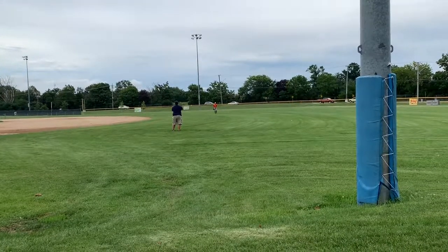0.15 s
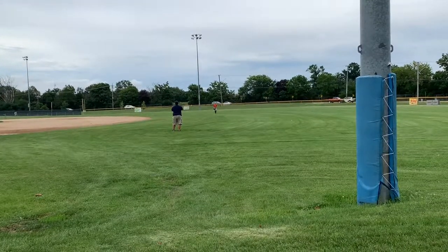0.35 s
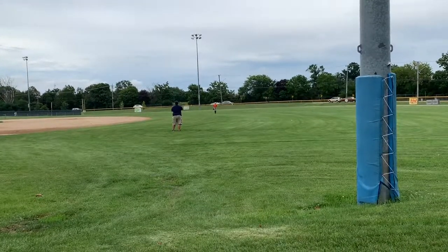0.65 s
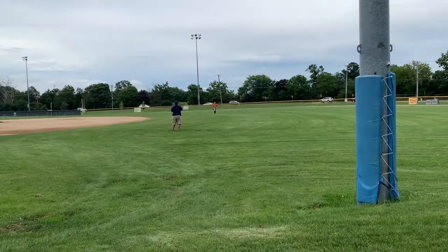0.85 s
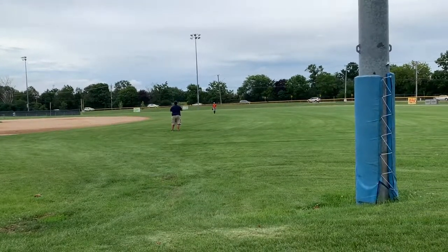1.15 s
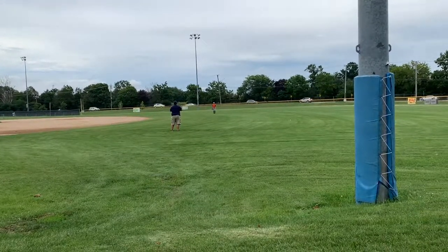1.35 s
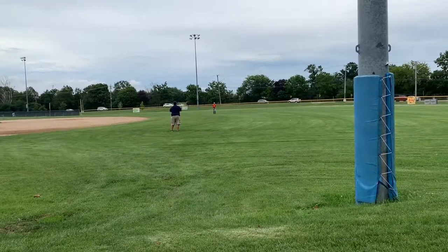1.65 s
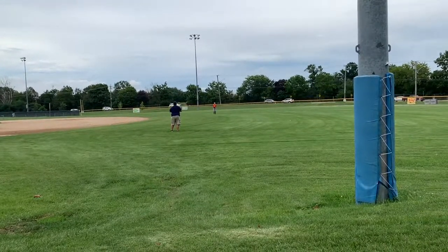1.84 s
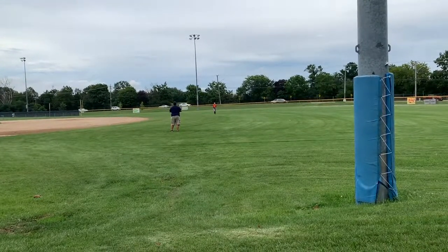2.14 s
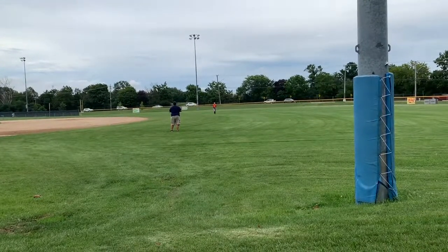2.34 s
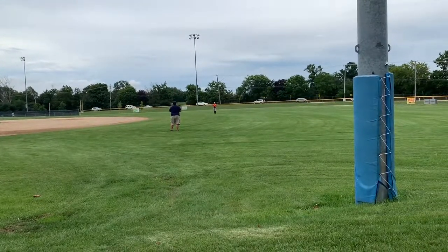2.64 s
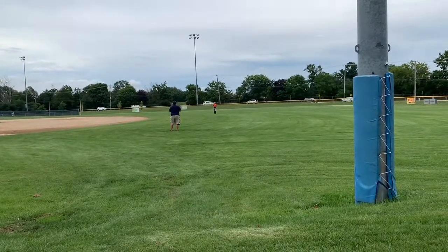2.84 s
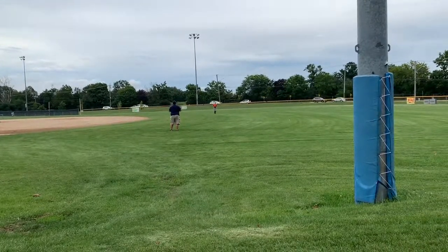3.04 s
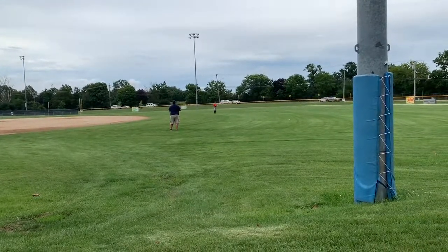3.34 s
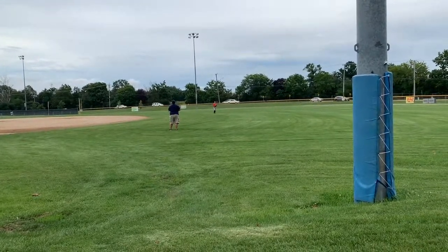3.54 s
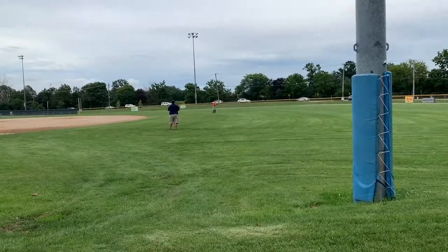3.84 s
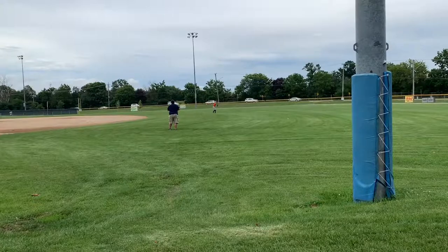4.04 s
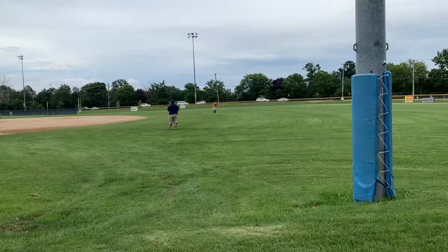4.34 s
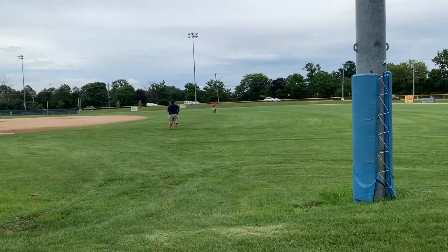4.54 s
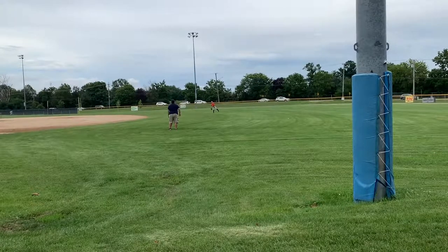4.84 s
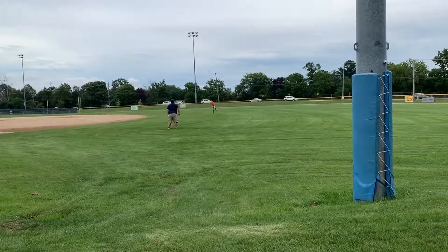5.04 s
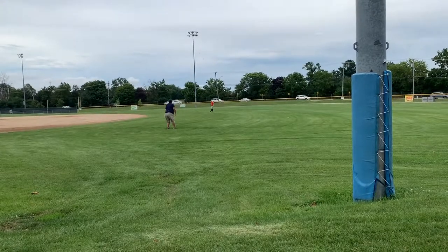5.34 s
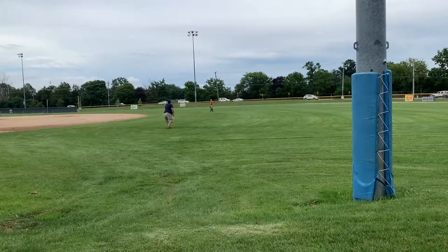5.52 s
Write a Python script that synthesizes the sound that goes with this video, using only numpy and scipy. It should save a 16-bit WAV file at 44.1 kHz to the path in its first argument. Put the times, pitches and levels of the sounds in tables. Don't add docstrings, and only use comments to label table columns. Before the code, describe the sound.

Outdoors on an open grass ball field, deep traffic rumble and soft tyre hiss come from a road beyond the outfield. A truck engine drones, then climbs in revs midway. A cricket chirps rapidly close to the right, another trills in repeated swells. A ball pops into a distant glove early on and again about a second later. Stereo phone microphone, grass faintly brushing its right side.

```python
import sys
import numpy as np
from scipy import signal
from scipy.fft import rfft, irfft
from scipy.io import wavfile
from scipy.ndimage import uniform_filter1d

SR = 44100
rng = np.random.default_rng(int(sys.argv[2]) if len(sys.argv) > 2 else 0)


def master(y):
    cut = np.clip(np.atleast_2d(y).T, -1, 1)
    pcm = np.round(cut * 32767)
    wavfile.write(sys.argv[1], SR, pcm.astype(np.int16))


def level_to_linear(level):
    exponent = np.asarray(level, float) / 20
    return 10 ** exponent


N = 250488
TIME = np.arange(N) / SR
HZ = np.arange(N // 2 + 1) * SR / N + 1e-3

# f/Hz, likeness/0-1
LIKENESS = [(60, 0.99), (170, 0.92), (260, 0.8), (350, 0.71), (450, 0.05), (800, 0.13), (1150, 0.44),
            (1550, 0.38), (2400, 0.27), (4300, 0.07), (7000, 0.43), (9000, 0)]
# f/Hz, left minus right/dB
LEAN = [(60, -3), (180, -0.7), (340, 2), (690, 0.7), (1150, 3), (1600, 2.5), (2300, 2), (4000, 1.5),
        (6500, -1), (7700, 1), (8700, -7.5)]

# t/s, level/dB
TRAFFIC = [(0, -41), (.04, -39), (.15, -43), (.43, -40.5), (1.85, -42.5), (2.03, -41), (2.79, -42),
           (3.31, -41.5), (3.45, -42), (3.84, -41.5), (4.4, -42), (5.19, -41.5), (5.4, -40), (5.68, -39)]
# f/Hz, density/dB per Hz
RUMBLE = [(8.8, -38), (15, -17.5), (49, 0.5), (97, -0.5), (129, -4), (157, -7), (250, -14.5), (432, -33.5),
          (577, -33), (700, -32), (910, -56), (1540, -120)]
# f/Hz, density/dB per Hz
TYRES = [(210, -9.5), (440, -6), (582, -11), (775, -1), (1320, -0.5), (2200, -7), (3090, -14),
         (4000, -16.5), (4750, -18), (5150, -20.5), (6100, -24), (7900, -30), (8600, -21), (8850, -26),
         (9050, -53), (10000, -61)]
# t/s, level against the other traffic/dB
LORRIES = [(0, -6), (.2, -5.5), (.5, -1), (.7, -5.5), (1.0, -2.5), (1.4, 3.5), (1.7, 3), (1.85, 5.5),
           (1.95, -6), (2.1, 0.5), (3.0, -1), (3.9, 4), (4.2, 5.5), (4.5, 1), (4.75, -3), (5.0, -1),
           (5.3, 2), (5.6, -6.5)]
LORRY_HZ = 80
TYRE_DB, TYRE_FOLLOW = -53.5, 0.14

# t/s, firing rate of one cylinder bank/Hz, load level/dB
TRUCK = [(0, 44.8, -45.5), (.3, 44.84, -55.5), (.55, 47.66, -46.5), (1.1, 46.58, -47.5), (1.66, 45.52, -50),
         (1.92, 44.12, -51.5), (2.09, 44.76, -40.5), (2.58, 48.79, -48), (2.75, 51.99, -48),
         (3.01, 59.48, -47.5), (3.35, 61.35, -48), (4.3, 61.13, -48.5), (4.55, 60, -57.5),
         (4.78, 60.1, -43), (5.0, 59.58, -61), (5.4, 60.3, -45), (5.68, 60.3, -58)]
ORDERS_DB, ORDER_WAVER_DB = [-5.5, -1, -12.5], [2, 1, 2.5]

# t/s, level/dB
FAR_SONG = [(0, -81), (.3, -71), (.4, -76), (1.1, -83), (1.45, -82), (1.6, -82), (2.25, -79), (2.4, -76),
            (2.8, -75), (3.1, -77), (3.8, -80), (4.2, -93), (5.3, -81), (5.68, -74)]
# t/s, peak level/dB, f/Hz, left minus right/dB
FAR_CHIRPS = [(0.0807, -70, 4740, -0.5), (0.3496, -78, 4830, 3), (0.8195, -75, 4750, 8),
              (0.8644, -67, 4830, 0), (2.2947, -68, 4590, -3), (2.3201, -72, 4740, 3.0),
              (2.528, -69, 4620, 3.5), (2.5543, -77, 4700, -10), (2.9219, -88, 4690, -4),
              (3.0036, -72, 4580, -14), (4.0991, -75, 4704, 0), (4.145, -74, 4676, -4),
              (4.2664, -76, 4745, -8), (4.536, -60, 4715, 3), (4.565, -67, 4540, 7),
              (4.5999, -69, 4810, 1.5), (4.6998, -85, 4790, 1.5), (4.9806, -71, 4570, 0.5),
              (5.2056, -71, 4550, -5)]
# f/Hz, density/dB per Hz
CHORUS = [(5000, -50), (5800, -30), (6500, -9), (7000, -3), (7450, 0), (7850, -4), (8300, -12), (8900, -30),
          (9400, -60)]
CHORUS_DB = -74

# start t/s, hold/s, level/dB
BRUSHES = [(0.027, 0.25, -93), (.49, .45, -92), (1.1, 0.25, -92), (1.382, 0.12, -85), (1.8, .12, -92),
           (1.975, 0.035, -83), (2.104, 0.0069, -72.5), (2.113, .004, -76), (2.151, 0.032, -82),
           (2.202, 0.16, -91), (2.42, 0.18, -90), (2.66, 0.073, -86), (2.84, .12, -83), (2.996, 0.32, -87),
           (3.349, 0.22, -90), (3.63, 0.12, -81), (3.857, 0.19, -89), (4.28, 0.21, -91),
           (4.55, 0.057, -83.5), (4.66, 0.19, -86.5), (4.991, .1, -90), (5.121, 0.48, -91),
           (5.601, 0.019, -85), (5.643, 0.035, -70)]
BRUSH_RISE_S, BRUSH_FALL_S, STILL_DB, BRUSH_PATCHY_DB = 0.0052, 0.017, -104, -1.5

# share of the stroke/0-1, f/Hz, level/dB
STROKE = [(0, 7720, -13), (.1, 8150, -5), (.25, 8145, -4.5), (.4, 8260, -6), (.55, 8190, -7),
          (.72, 8060, -0.5), (.9, 8050, -10.5), (1, 7870, -15)]
# t/s at the middle of the first stroke, strokes/count
RUNS = [(.0301, 3), (.2145, 5), (.52, 1), (.5834, 1), (.6464, 4), (.8935, 1), (.961, 4), (1.2088, 2),
        (1.3336, 2), (1.4575, 12), (2.189, 8), (2.6725, 12), (3.4048, 2), (3.523, 1), (3.5873, 15),
        (4.4998, 5), (4.8731, 1), (4.9637, 4), (5.2037, 3), (5.3829, 3), (5.5664, 1), (5.6255, 1)]
# t/s, level/dB
EFFORT = [(0, -59.5), (.39, -58), (.55, -61.5), (.8, -57), (1.0, -60.5), (1.5, -59.5), (1.9, -61),
          (2.06, -58), (2.25, -59), (2.5, -63), (2.63, -59), (2.86, -63.5), (3.5, -62), (3.65, -61),
          (3.9, -59.5), (4.2, -61.5), (4.7, -59.5), (5.68, -60.5)]
STROKE_S, BEAT_S, BEAT_SCATTER_S = .021, .0607, .0004
CHIRP_LEFT_DB, STROKE_SCATTER_DB = -15, 0.5

# t/s of the last and loudest pulse, level/dB
TRILLS = [
    (.454, -62),
    (1.099, -62),
    (1.720, -65.5),
    (2.336, -68),
    (2.972, -65),
    (3.642, -65),
    (4.277, -64.5),
    (4.960, -66),
    (5.600, -68),
]
# t/s, length/s, start f/Hz, end f/Hz, level/dB
BIRD = [
    (.333, .022, 5500, 6300, -76),
    (.415, .038, 5550, 4800, -75),
]
# t/s, peak level/dB, leather snap f/Hz, left port's delay/samples, ground bounce/dB
POPS = [
    (1.44243, -47.3, 4500, 16, -20),
    (2.54196, -46.8, 4950, 16, -7),
]

# f/Hz, density/dB per Hz
HISS = [(7500, -30), (8800, -20), (10500, -11), (11300, -13), (12100, -12), (12400, -1), (13300, 0),
        (14300, -2), (15000, -5)]
# f/Hz, side minus mid/dB
HISS_APART = [(9000, 0), (11000, 8), (12000, 8), (12500, -6), (13500, -4), (15000, -1)]
HISS_DB = -86


def over_hz(table):
    hz, value = np.transpose(table)
    return np.interp(np.log(HZ), np.log(hz), value)


def over_time(table):
    s, *columns = np.transpose(table)
    return [np.interp(TIME, s, c) for c in columns]


def unit(x):
    return x / np.sqrt(np.mean(x ** 2))


def walk(rate):
    k = int(SR / rate)
    held = np.repeat(rng.standard_normal(N // k + 1), k)
    return unit(uniform_filter1d(uniform_filter1d(held, k), k)[:N])


def band(x, low_hz, high_hz):
    return signal.sosfilt(signal.butter(2, [low_hz, high_hz], "band", fs=SR, output="sos"), x)


def add(out, sound, s, left_db, late=0.):
    for side, gain, start in ((0, level_to_linear(left_db), s * SR + late), (1, 0.97, s * SR)):
        i = max(int(round(start)), 0)
        piece = sound[:max(N - i, 0)]
        out[side, i:i + len(piece)] += gain * piece


def stroke(length_s, hz, db, phase):
    share = np.linspace(0, 1, int(length_s * SR))
    edge = np.clip(np.minimum(share, 1 - share) / 0.062, 0, 1)
    tone = np.sin(phase + 2 * np.pi * np.cumsum(hz(share)) / SR)
    return edge * level_to_linear(db(share)) * np.sqrt(2) * tone


def field_noise(spectrum, lag, flicker_db):
    shared, left, right = rfft(rng.standard_normal((3, N)))
    like = np.clip(over_hz(LIKENESS), 0, 1)
    lean = level_to_linear(over_hz(LEAN) / 2)
    late = np.exp(-2j * np.pi * HZ * lag / SR)
    alike, apart = np.sqrt(like) * shared, np.sqrt(1 - like)
    pair = np.array([lean * (alike * late + apart * left), (alike + apart * right) / lean])
    pair = pair * level_to_linear(over_hz(spectrum))
    out = 0
    for octave in range(4, 15):
        window = np.cos(np.pi / 2 * np.clip(np.log2(HZ) - octave, -1, 1)) ** 2
        out = out + irfft(pair * window, N) * level_to_linear(flicker_db * walk(9))
    return unit(out)


def patchy(x, spread_db, full_hz):
    hz, _, cells = signal.stft(x, SR, nperseg=1024)
    field = rng.standard_normal(cells.shape[1:])
    field = uniform_filter1d(field, size=2, axis=0)
    field = unit(uniform_filter1d(field, size=2, axis=1))
    depth_db = spread_db * np.sqrt(np.clip(hz / full_hz, 0, 1))[:, None]
    even_db = depth_db ** 2 * np.log(10) / 20
    faded = signal.istft(cells * level_to_linear(depth_db * field - even_db), nperseg=1024)[1]
    return unit(faded[:, :N])


def road():
    traffic_db, = over_time(TRAFFIC)
    lorry_db, = over_time(LORRIES)
    rumble = field_noise(RUMBLE, lag=2.6, flicker_db=1.82)
    deep = signal.sosfiltfilt(signal.butter(2, LORRY_HZ, fs=SR, output="sos"), rumble)
    rumble = rumble + deep * (level_to_linear(lorry_db) - 1)
    tyres = patchy(field_noise(TYRES, lag=12.5, flicker_db=.35), spread_db=4, full_hz=5000)
    swell_db = TYRE_FOLLOW * (traffic_db - traffic_db.mean())
    return rumble * level_to_linear(traffic_db - 0.5) + tyres * level_to_linear(TYRE_DB + swell_db + 0.2 * walk(2.877))


def truck():
    hz, load_db = over_time(TRUCK)
    turn = 2 * np.pi * np.cumsum(hz * (1 + 0.003 * walk(6))) / SR
    tone = 0
    for k, db, waver_db in zip((1, 2, 3), ORDERS_DB, ORDER_WAVER_DB):
        level_db = load_db + db + waver_db * walk(2.86) + 1.9 * walk(7)
        tone = tone + level_to_linear(level_db) * np.sqrt(2) * np.sin(k * turn + k)
    return tone * level_to_linear(np.array([[-1.1], [1.1]]))


def far_crickets():
    level_db, = over_time(FAR_SONG)
    pulses = np.sin(2 * np.pi * np.cumsum(44 + 9 * walk(12)) / SR)
    gate = np.clip(pulses + .7, 0, 1)
    tone = gate * np.sin(2 * np.pi * np.cumsum(4165 + 28 * walk(40)) / SR)
    out = unit(tone) * level_to_linear(level_db - 3 + 2.6 * np.array([walk(22), walk(22)]))
    for (s, db, hz, pan_db), phase in zip(FAR_CHIRPS, rng.uniform(0, 10.6, len(FAR_CHIRPS))):
        chirp = stroke(.016, lambda u: hz + 110 - 220 * u, lambda u: -20 * (u - .4) ** 2, phase)
        add(out, level_to_linear(db - 12.0 - pan_db / 2) * chirp, s, pan_db)
    return out


def chorus():
    return level_to_linear(CHORUS_DB + 1.2 * walk(24.9)) * field_noise(CHORUS, lag=15.35, flicker_db=.5)


def rustle():
    level = level_to_linear(STILL_DB)
    for s, hold, db in BRUSHES:
        rise = np.minimum(TIME - s, 0) / BRUSH_RISE_S
        fall = np.maximum(TIME - s - hold, 0) / BRUSH_FALL_S
        level = level + level_to_linear(db) * np.exp(rise - fall)
    grains = rng.standard_normal((2, N)) * level_to_linear(1.0 * walk(420))
    thin = unit(band(grains, 8700, 10600)) * level_to_linear(np.array([[-14], [5]]))
    broad = unit(band(grains, 3500, 12500)) * level_to_linear(np.array([[-8], [-4]]))
    return (thin + broad) * level * level_to_linear(BRUSH_PATCHY_DB * walk(25.12))


def near_cricket():
    out = np.zeros((2, N))
    share, hz, db = np.transpose(STROKE)
    beats = np.concatenate([first + BEAT_S * np.arange(strokes) for first, strokes in RUNS])
    levels_db = np.interp(beats, *np.transpose(EFFORT))
    for s, level_db, (a, b, c, d, e, f) in zip(beats, levels_db, rng.standard_normal((len(beats), 6))):
        def pitch(u):
            return np.interp(u, share, hz) + 18 * b

        def loudness(u):
            return np.interp(u, share, db) + 3.1 * c * (u - .5) + 2.1 * np.sin(22 * u + 9 * d)

        tone = stroke(STROKE_S * (1 + 0.037 * a), pitch, loudness, 9 * d)
        start = s + BEAT_SCATTER_S * f - .46 * STROKE_S
        add(out, level_to_linear(level_db + 3.0 + STROKE_SCATTER_DB * e) * tone, start, CHIRP_LEFT_DB, late=10.0)
    out[:, 230:] += level_to_linear(-15) * out[:, :-230]
    return out


def trilling_cricket():
    out = np.zeros((2, N))
    back = np.arange(20)
    gap_s = 0.011 + 0.011 * np.exp(-(back / 6.7) ** 2)
    before_s = np.cumsum(gap_s) - gap_s[0]
    for (end, level_db), chance in zip(TRILLS, rng.standard_normal((len(TRILLS), len(back), 2))):
        for k, before, gap, (a, b) in zip(back, before_s, gap_s, chance):
            tone = stroke(0.8 * gap, lambda u: 8640 - 120 * u + 15 * a, lambda u: -50 * (u - .5) ** 2, 9 * b)
            add(out, level_to_linear(level_db + 1 - .5 * k + 1.8 * b) * tone, end - before - .34 * gap, -10, late=12)
    return out


def bird():
    out = np.zeros((2, N))
    for s, length, start_hz, end_hz, db in BIRD:
        note = stroke(length, lambda u: start_hz + (end_hz - start_hz) * u, lambda u: -16 * (u - .5) ** 2, 0)
        add(out, level_to_linear(db) * note, s, 1.5)
    return out


def glove():
    out, t = np.zeros((2, N)), np.arange(900) / SR
    for (s, db, hz, late, bounce_db), noise in zip(POPS, rng.standard_normal((len(POPS), len(t)))):
        snap = -np.exp(-((t - .0003) / .00015) ** 2) * np.cos(2 * np.pi * hz * (t - .0003))
        turf = band(noise, 2500, 6500) * np.exp(-t / .005)
        add(out, level_to_linear(db + 7) * (snap + level_to_linear(-17) * turf), s, 0, late)
        out[1, int(s * SR) + 23:][:len(t)] += level_to_linear(db + 7 + bounce_db) * snap
    return out


def scene():
    insects = far_crickets() + chorus() + near_cricket() + trilling_cricket()
    return road() + truck() + insects + rustle() + bird() + glove()


def low_pass(x):
    return signal.sosfilt(signal.butter(12, 15000, fs=SR, output="sos"), x)


def record(dry):
    mid, side = rfft(rng.standard_normal((2, N))) * level_to_linear(over_hz(HISS))
    side = side * level_to_linear(over_hz(HISS_APART))
    hiss = irfft(np.array([mid + side, mid - side]), N)
    hiss = patchy(hiss, spread_db=3, full_hz=9000)
    return low_pass(dry + level_to_linear(HISS_DB) * hiss)


dry = scene()
out = record(dry)
master(out)
```